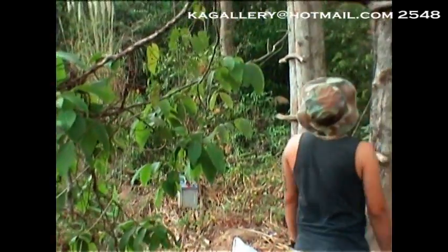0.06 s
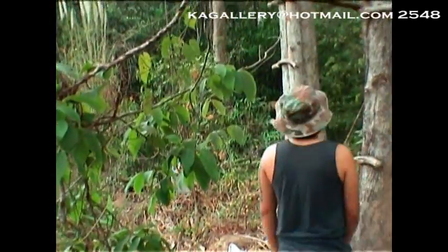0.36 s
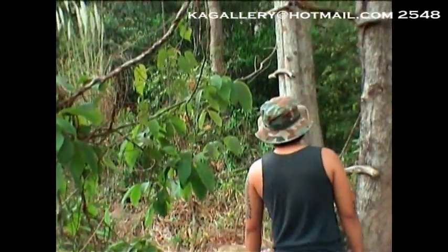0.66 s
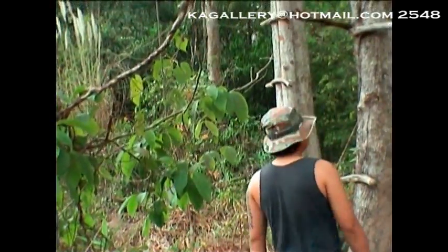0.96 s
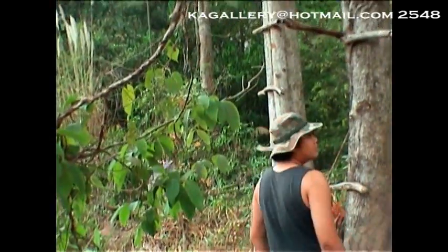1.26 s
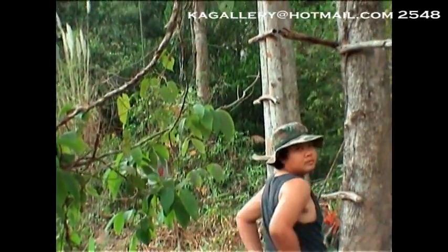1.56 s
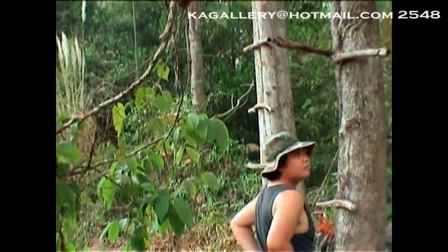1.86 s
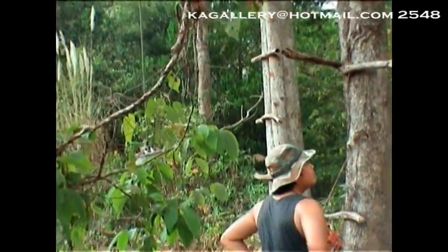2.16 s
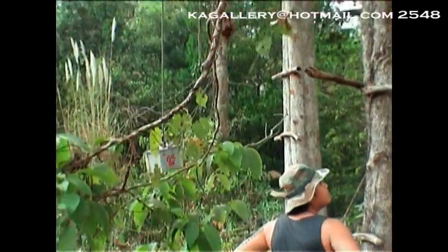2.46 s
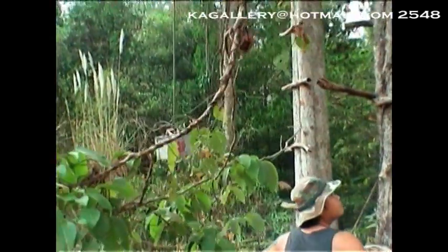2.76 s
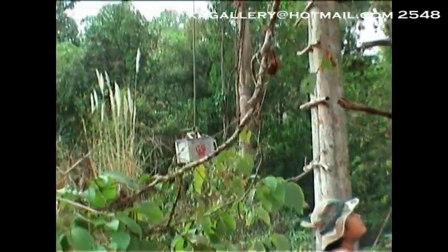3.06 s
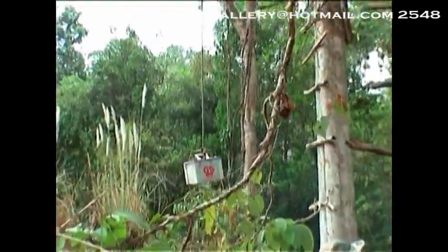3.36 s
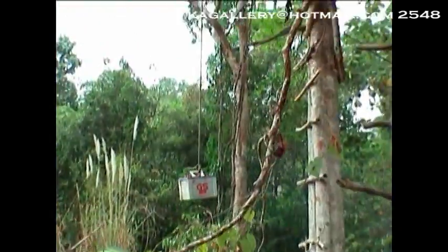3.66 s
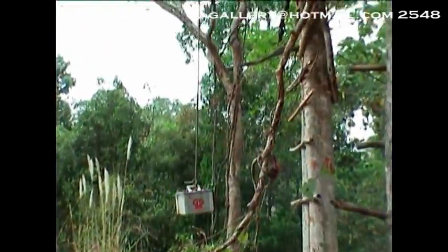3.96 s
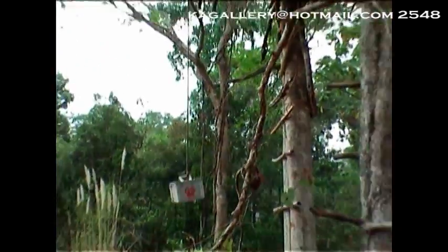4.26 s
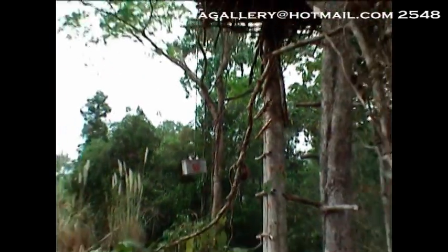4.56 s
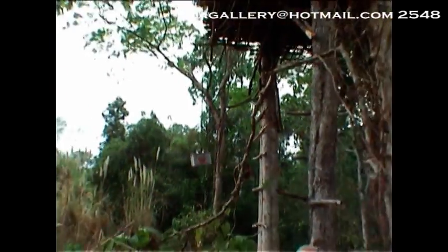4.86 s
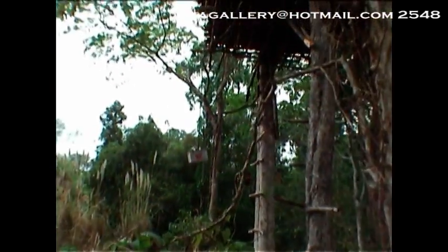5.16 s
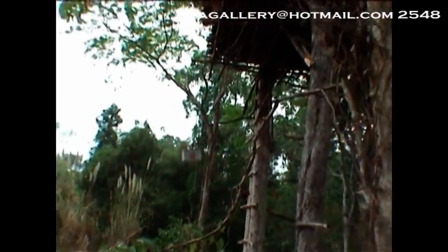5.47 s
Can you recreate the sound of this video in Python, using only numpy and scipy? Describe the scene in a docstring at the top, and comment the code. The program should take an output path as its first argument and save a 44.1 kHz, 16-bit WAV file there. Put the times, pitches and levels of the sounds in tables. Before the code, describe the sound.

Insects hiss in a still forest and far birds call while a hoisted metal box bumps and rasps unevenly along the bark.

```python
"""Insects hiss in still forest air, over the faint hum of the camera's motor. A little left of the
microphone a metal supply box is hauled up a tree on a rope: it knocks and scrapes along the trunk,
its damped panels ring and the forest answers. Far off a barbet repeats three hollow notes and a small
bird whistles falling ones; dry ticks, as of twigs, sound nearby.
Late on, the camera's sound drops out once for an instant."""
import sys
import numpy as np
from scipy import signal
from scipy.fft import rfft, irfft, next_fast_len
from scipy.io import wavfile
from scipy.ndimage import uniform_filter1d

SR = 44100
rng = np.random.default_rng(int(sys.argv[2]) if len(sys.argv) > 2 else 0)


def dump_mix(stems):
    """Bounce the given channels to the path in sys.argv[1] as a 16-bit WAV at rate SR."""
    frames = np.atleast_2d(stems).T  # one column per channel
    limited = np.clip(frames, -1, 1)  # hard clip at full scale
    pcm = np.round(limited * 32767).astype(np.int16)
    wavfile.write(sys.argv[1], SR, pcm)


N = 251458

# the load shaking in the box, in blows and drags alike: (frequency [Hz], level per Hz [dB])
LOAD_SPECTRUM = [(40, -55), (90, -19), (150, 3.5), (210, -1.5), (330, 1.5), (600, -6), (1500, -50)]


def amp(db):
    """Decibels to gain."""
    return 10 ** (np.asarray(db) / 20)


def unit(x):
    """x at rms 1."""
    return x / np.sqrt(np.mean(x ** 2) + 1e-20)


def along(points, hz):
    """(frequency [Hz], value) points read on a log axis."""
    freqs, values = np.transpose(points)
    return np.interp(np.log(hz + 1), np.log(freqs + 1), values)


def add(track, s, sound):
    """Mix a sound into a track at time s."""
    part = track[max(round(s * SR), 0):][:len(sound)]
    part += sound[:len(part)]


def filtered(x, response):
    """x times a response of frequency."""
    n = x.shape[-1]
    padded = next_fast_len(n + 8192)
    return irfft(rfft(x, padded) * response(np.fft.rfftfreq(padded, 1 / SR)), padded)[..., :n]


def coloured(x, spectrum):
    """x shaped by (frequency [Hz], level [dB]) points, at rms 1."""
    return unit(filtered(x, lambda hz: amp(along(spectrum, hz))))


def placed(x, balance):
    """x leaning to one side by (frequency [Hz], left over right [dB]) points."""
    return filtered(x, lambda hz: amp(np.outer([.5, -.5], along(balance, hz))))


def narrow(shape, centre_hz, width_hz):
    """Noise of rms 1 through a steep resonance."""
    def resonance(hz):
        damping = 1j * hz * width_hz
        return (damping / (centre_hz ** 2 - hz ** 2 + damping)) ** 2
    return unit(filtered(rng.standard_normal(shape), resonance))


def rush(spectrum, likeness, patchy_db):
    """Stereo noise of rms 1 with soft patches of random gain."""
    noise = signal.stft(rng.standard_normal((2, N)), nperseg=512)[2]
    patches = uniform_filter1d(rng.standard_normal(noise.shape[1:]), size=6, axis=0)
    patches = uniform_filter1d(patches, size=14, axis=1)
    pair = signal.istft(noise * amp(patchy_db * unit(patches)), nperseg=512)[1][:, :N]
    spread = lambda hz: np.arccos(np.clip(along(likeness, hz), -1, 1)) / 2
    mid, side = filtered(pair, lambda hz: np.array([np.cos(spread(hz)), np.sin(spread(hz))]))
    return coloured(np.array([mid + side, mid - side]), spectrum)


def air_and_insects():
    """Still forest air, an insect chorus that swells and ebbs, and a shriller kind all around."""
    # the soft rush of the air: (frequency [Hz], level per Hz [dB])
    air_spectrum = [(32, -21), (55, -13.5), (107, -10), (152, -9), (366, -4.5), (393, -6), (693, -3.5),
                    (921, -7), (1170, -8.5), (2160, -10.5), (2550, -13.5), (3550, -16.5), (7400, -19),
                    (8740, -26), (15800, -31)]
    # how alike the air is in the two channels: (frequency [Hz], likeness [-1 to 1])
    air_likeness = [(60, -0.37), (350, 0.25), (580, -0.52), (950, 0.39), (2400, 0.39), (6000, 0.73),
                    (9000, 0.46), (15000, 0.54)]
    # the hiss of the chorus: (frequency [Hz], level per Hz [dB])
    chorus_spectrum = [(3500, -67), (4500, -5), (5200, -1), (6600, 0.5), (7400, -1), (8400, -15.5),
                       (12000, -46)]
    # its slow swell: (time [s], level [dB])
    chorus_swell = [(0, -60.5), (.9, -55), (3.2, -59.5), (4.6, -62), (5.7, -58.5)]
    # lean of air and chorus at the microphone: (frequency [Hz], left over right [dB])
    balance = [(60, 0), (110, 2), (200, 5), (380, 3.5), (700, 4), (1290, 3.5), (2380, 1), (4400, -1),
               (8120, -1), (15000, 0.5)]
    air = amp(-50.5) * rush(air_spectrum, air_likeness, patchy_db=1.5)
    swell_db = np.interp(np.arange(N) / SR, *np.transpose(chorus_swell))
    chorus = amp(swell_db) * rush(chorus_spectrum, likeness=[(6000, .9)], patchy_db=1.2)
    shrill = amp(-63) * narrow((2, N), centre_hz=7760, width_hz=460)
    return placed(air + chorus, balance) + shrill


def camera_motor():
    """Right at the microphone, the camera's motor hums and whirs faintly."""
    # noise bands of the whir: (centre [Hz], width [Hz], level [dB])
    whir_bands = [(40, 16, -80), (1978, 110, -70), (2217, 19, -67)]
    hum_hz = 40.5
    hum = amp(-73) * unit(np.sin(2 * np.pi * hum_hz * np.arange(N) / SR))
    return hum + sum(amp(db) * narrow(N, centre, width) for centre, width, db in whir_bands)


def grit(spectrum, rough_db, grain_s):
    """One second of tiny contacts of uneven strength."""
    grain_index = np.arange(SR) / SR / grain_s
    strength = np.interp(grain_index, np.arange(SR), rng.standard_normal(SR))
    return coloured(rng.standard_normal(SR) * amp(rough_db * strength), spectrum)


def stroke(rise, t60):
    """Contact force builds up, then dies away; one second long."""
    t = np.arange(SR) / SR
    return np.minimum(t / max(rise, 1 / SR), 1) * amp(-60 * np.maximum(t - rise, 0) / t60)


def load_shake(rise):
    """The slower a contact builds up, the more it shakes the load."""
    db_per_doubling, reference_rise_s = 4.5, 0.0039
    return amp(db_per_doubling * np.log2(rise / reference_rise_s))


def blows():
    """Each blow crushes bark: a short crack, the knock of the box wall and a slower thud of the load."""
    # the box hits the trunk: (time [s], rise [s], knock level [dB], crack level [dB])
    hits = [(.045, .004, -45, -45.5), (.085, 0.018, -41.5, -52), (.116, 0.0048, -43.5, -41.5),
            (.184, 0.0062, -44, -46.5), (.254, 0.011, -24, -27.5), (.300, 0.0024, -27, -27),
            (.310, 0.0039, -23.5, -25.5), (.404, 0.0049, -22, -22), (.607, 0.0081, -26.5, -27.5),
            (.623, .006, -22, -25.5), (1.040, 0.0013, -34, -45), (1.077, 0.0034, -32, -43),
            (1.118, 0.00081, -27, -21), (1.161, 0.00079, -14.5, -12), (1.166, 0.0094, -25.5, -28),
            (1.705, 0.0048, -40.5, -46), (1.773, 0.0076, -43, -46), (1.803, 0.013, -33, -40.5),
            (1.924, 0.00083, -38, -47), (2.181, 0.0015, -40, -55), (2.534, 0.00056, -38, -39),
            (3.945, 0.00088, -34, -48), (4.017, 0.0049, -30.5, -38.5), (4.039, 0.002, -36, -51),
            (4.060, 0.0026, -36, -41), (4.081, 0.00064, -33.5, -27), (4.204, 0.0034, -38.5, -48),
            (4.313, 0.0014, -45.5, -65), (4.75, 0.0089, -45.5, -72), (4.802, 0.0088, -36.5, -47.5),
            (4.923, 0.0015, -37, -38.5), (5.207, .001, -41.5, -49), (5.413, 0.0034, -34.5, -48),
            (5.631, 0.0018, -42.5, -60)]
    # the wall's knock: (frequency [Hz], level per Hz [dB])
    knock_spectrum = [(150, -57), (330, -20), (600, -1.5), (1100, -2), (1900, -2), (2700, -7.5),
                      (5000, -18), (12000, -69)]
    # the bark's crack: (frequency [Hz], level per Hz [dB])
    crack_spectrum = [(900, -63), (2200, 0.5), (3000, -1), (5000, 2), (6800, -2.5), (8500, -9.5),
                      (11000, -19.5), (16000, -25)]
    out = np.zeros(N)
    for s, rise, knock_db, crack_db in hits:
        knock = stroke(rise, t60=0.086 + 3.7 * rise) * grit(knock_spectrum, rough_db=0.6, grain_s=0.0011)
        thud = stroke(rise, t60=0.24) * grit(LOAD_SPECTRUM, rough_db=3, grain_s=.002)
        thud *= amp(-18) * load_shake(rise)
        crack = stroke(rise, t60=0.048 + 8.4 * rise) * grit(crack_spectrum, rough_db=5, grain_s=0.00051)
        add(out, s, amp(knock_db) * (knock + thud) + amp(crack_db) * crack)
    return out


def box_panels(contact):
    """Every contact is heard directly and also rings the box's damped metal panels."""
    # panel modes: (frequency [Hz], level [dB], t60 [s])
    modes = [(160, -2, .15), (440, -1, .08), (608, 4.5, .09), (925, 4, .1), (1060, 2, .07), (1345, -5, .1),
             (1560, -4, .06), (1778, 3, .1), (2025, -5, .09), (2330, -4, .07), (2900, -5, .04),
             (3620, -7, .05), (4570, -5, .04), (5672, -6, .06)]
    t = np.arange(SR // 2) / SR
    ring = np.zeros(len(t))
    for hz, db, t60 in modes:
        scale = np.log(1e6) / (t60 * SR)  # keeps the gain at resonance independent of t60
        ring += scale * amp(db - 60 * t / t60) * np.cos(2 * np.pi * hz * t)
    return amp(-1) * contact + amp(-3) * signal.fftconvolve(contact, ring)[:N]


def forest(x, wet_db, likeness, blur_octaves):
    """Trunks and leaves scatter a sound into a noisy stereo tail of slightly blurred colour."""
    # how long sound lingers among the trees: (frequency [Hz], t60 [s])
    decay_times = [(100, 0.76), (260, 0.93), (700, 0.63), (1900, 0.5), (5000, 0.62), (12000, 0.34)]
    hz, t, spectra = signal.stft(x, SR, nperseg=512)
    octave = np.log2(hz + hz[1])
    blur = np.exp(-.5 * ((octave[:, None] - octave) / blur_octaves) ** 2)
    power = blur / blur.sum(axis=1, keepdims=True) @ np.abs(spectra) ** 2
    fade = amp(-60 * t / along(decay_times, hz)[:, None]) ** 2 * (t > 0)
    lingering = signal.fftconvolve(power, fade / fade.sum(axis=1, keepdims=True), axes=1)[:, :len(t)]
    noise = signal.stft(rng.standard_normal((2, N)), nperseg=512)[2]
    mid, side = signal.istft(np.sqrt(np.abs(lingering)) * noise / noise.std(), nperseg=512)[1][:, :N]
    spread = np.arccos(np.clip(likeness, 0, 1)) / 2
    return x + amp(wet_db) * (np.cos(spread) * mid + np.outer([1, -1], np.sin(spread) * side))


def from_trunk(x):
    """Sound from the tree on the left reaches the two microphone ports unequally and out of step."""
    # lean toward the tree: (frequency [Hz], left over right [dB])
    balance = [(60, 1), (110, 7), (200, 6.5), (380, 6), (700, 5.5), (1290, 3.5), (2380, 2.5), (4400, 0),
               (8120, -0.5), (15000, -2)]
    # phase between the ports: (frequency [Hz], lead of the left [rad])
    port_phase = [(0, 0), (7670, -0.42), (8180, -1.4), (10800, 1.6), (13000, 2.5), (16400, -0.0)]
    return filtered(placed(x, balance), lambda hz: np.exp(1j * np.outer([.5, -.5], along(port_phase, hz))))


def bird_note(length_s, start_hz, end_hz, bend):
    """A far note that swells and fades as its pitch falls, smeared by echoes off the trunks."""
    progress = np.linspace(0, 1, int(length_s * SR))
    hz = end_hz + (start_hz - end_hz) * (1 - progress) ** bend
    hz *= rng.normal(1, 0.0125)
    tone = np.sqrt(2) * np.sin(np.pi * progress) * np.sin(2 * np.pi * np.cumsum(hz) / SR)
    heard = np.pad(tone, (0, SR // 10))
    for delay_s in rng.uniform(.004, .03, size=4):
        add(heard, delay_s, amp(-9 - 250 * delay_s) * tone)
    return heard


def barbet():
    """Far off in the trees, a barbet repeats three hollow notes at an even pace."""
    # each phrase begins: (time [s])
    starts = [.365, 1.205, 1.958, 2.752, 3.535, 4.298, 5.125]
    # notes of a phrase: (delay [s], length [s], start pitch [Hz], end pitch [Hz], level [dB])
    phrase = [(0, .035, 950, 843, -3), (0.074, 0.036, 980, 751, 2.5), (0.165, .048, 970, 890, 0.5)]
    out = np.zeros(N)
    for s in starts:
        for delay, length, start_hz, end_hz, db in phrase:
            add(out, s + delay, amp(db - 48) * bird_note(length, start_hz, end_hz, bend=1.1))
    return out


def twigs():
    """Dry snaps near the microphone, as of twigs, each around its own pitch; higher ones die sooner."""
    # ticks and taps: (time [s], level [dB], pitch [Hz])
    snaps = [(.380, -27, 376), (0.912, -39, 5160), (2.344, -44, 1190), (2.392, -39, 1100),
             (2.394, -37.5, 2700), (2.971, -44, 2000), (5.395, -37, 776), (5.561, -42, 4470)]
    decay_cycles = 23
    out = np.zeros(N)
    for s, db, hz in snaps:
        envelope = stroke(rise=0.0024, t60=decay_cycles / hz)
        add(out, s, amp(db) * envelope * narrow(SR, hz, width_hz=1.2 * hz))
    return out


def scrapes():
    """The box catches and slips on the bark, its load rumbling as it goes."""
    # drags along the trunk: (time [s], rise [s], t60 [s], level [dB])
    drags = [(.44, 0.043, 0.072, -36), (.65, 0.014, 0.6, -38.5), (1.80, 0.078, 0.84, -44),
             (2.131, 0.078, 0.15, -45.5), (2.546, 0.0077, 0.36, -42.5), (2.67, .028, 0.43, -45),
             (3.61, 0.081, 0.13, -49.5), (4.091, 0.022, 0.47, -47.5), (4.95, 0.038, 0.49, -33.5),
             (5.099, 0.038, 0.2, -42), (5.199, 0.11, 1, -48.5)]
    # the bark's rasp: (frequency [Hz], level per Hz [dB])
    rasp_spectrum = [(150, -61), (450, -9), (1000, 0), (2000, 0.5), (3200, -6.5), (5500, -6.5), (8500, -15),
                     (11000, -23), (16000, -26)]
    out = np.zeros(N)
    for s, rise, t60, db in drags:
        rasp = grit(rasp_spectrum, rough_db=2.5, grain_s=0.0024)
        rumble = amp(-26.5) * load_shake(rise) * grit(LOAD_SPECTRUM, rough_db=3.5, grain_s=.006)
        add(out, s, amp(db) * stroke(rise, t60) * (rasp + rumble))
    return out


def small_bird():
    """A small, distant bird slides down the same whistle again and again."""
    # falling whistles: (time [s], level [dB])
    calls = [(1.383, -56), (2.749, -58), (3.02, -55), (3.255, -56), (3.513, -55), (3.75, -52.5)]
    out = np.zeros(N)
    for s, db in calls:
        add(out, s, amp(db) * bird_note(length_s=.072, start_hz=5300, end_hz=3000, bend=1.7))
    return out


def scene():
    """From the microphone: the box a little to the left, twigs nearby, birds far off in the trees."""
    box = box_panels(blows() + scrapes())
    haul = from_trunk(forest(box, wet_db=-11.5, likeness=0.89, blur_octaves=0.19))
    hoots = forest(barbet(), wet_db=-4, likeness=.6, blur_octaves=.03) * amp([[-1], [-3]])
    whistles = forest(small_bird(), wet_db=-2.5, likeness=0.23, blur_octaves=0.038)
    ticks = twigs() * amp([[1.5], [-1.5]])
    return haul + hoots + whistles + ticks + air_and_insects() + camera_motor()


def record(dry):
    """The camera's sound drops out for an instant, and it keeps nothing above its band limit."""
    start_s, end_s, dip_db = 4.85, 4.88, -38
    top_hz = 15900
    t = np.arange(N) / SR
    dropout_db = np.where((t > start_s) & (t < end_s), dip_db, 0.0)
    gain = amp(uniform_filter1d(dropout_db, size=130))
    return filtered(dry * gain, lambda hz: hz < top_hz)


dry = scene()
out = record(dry)
dump_mix(out)
```